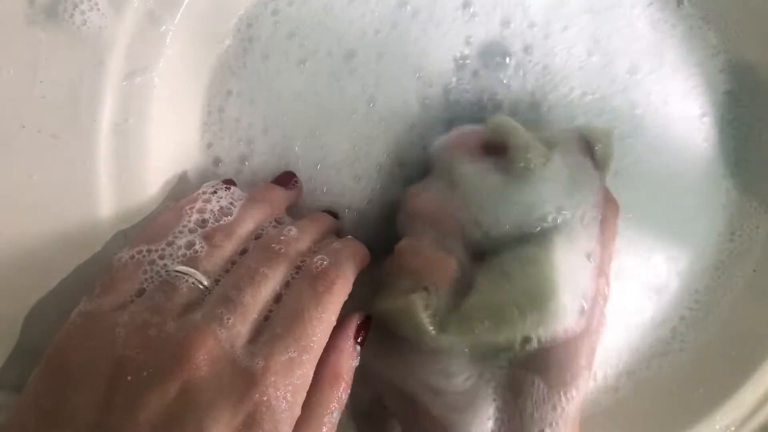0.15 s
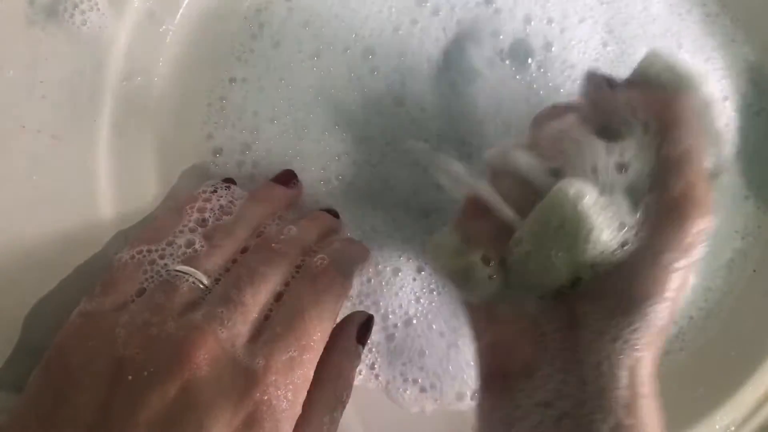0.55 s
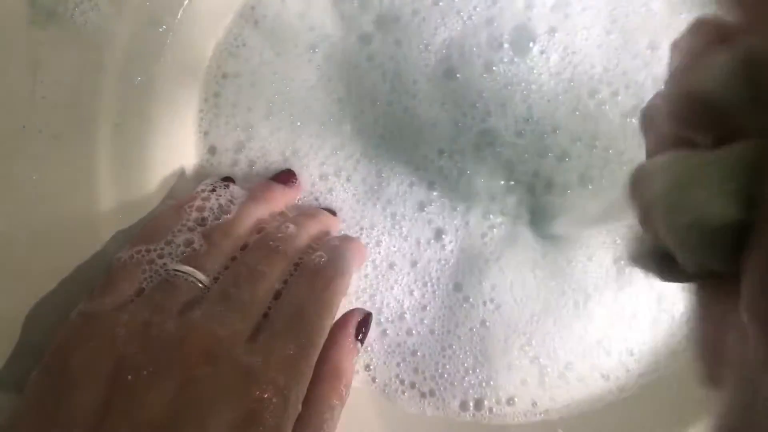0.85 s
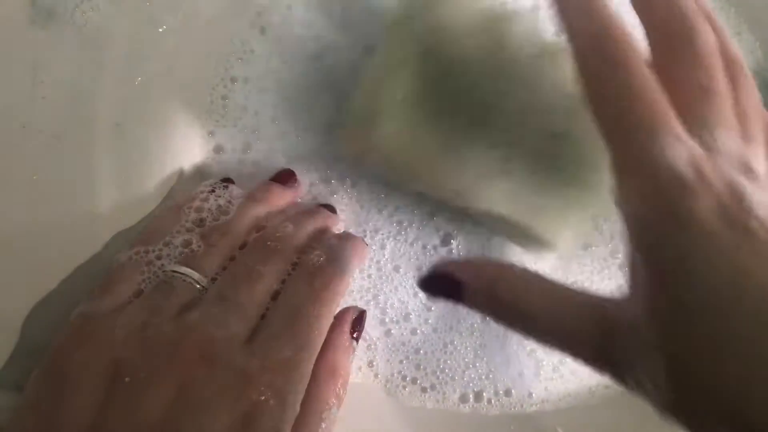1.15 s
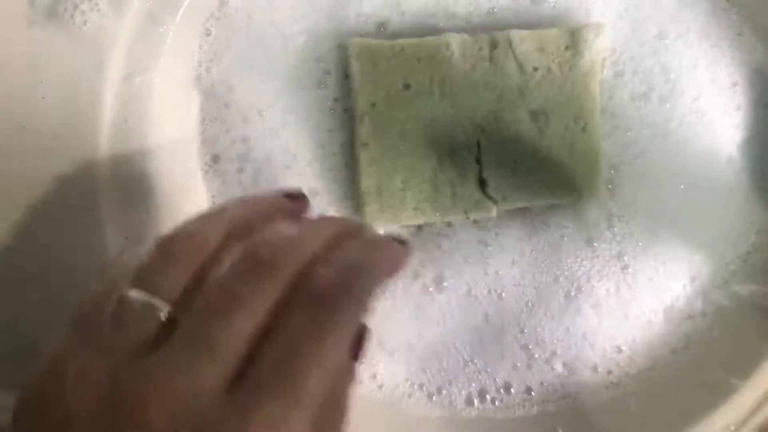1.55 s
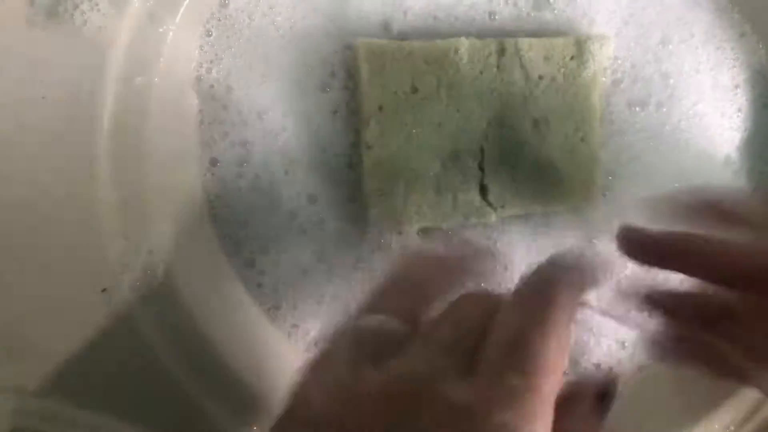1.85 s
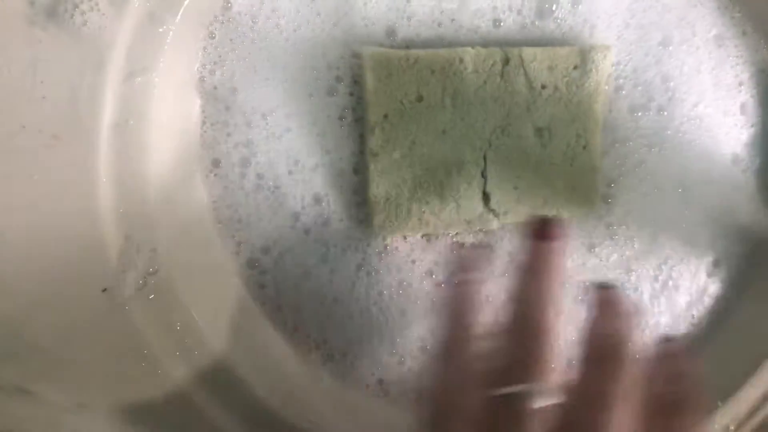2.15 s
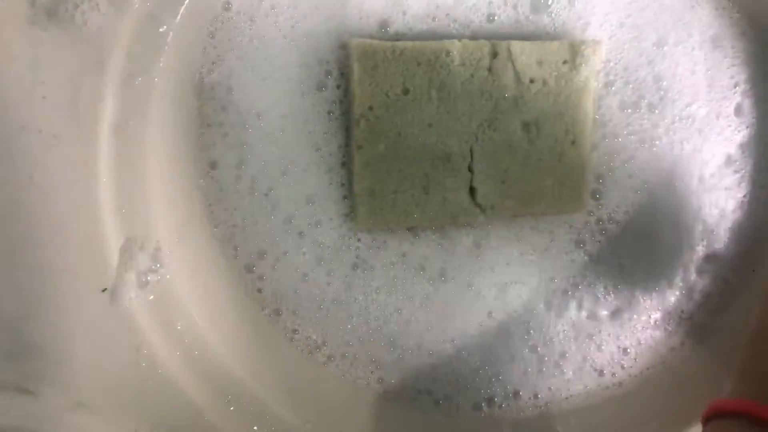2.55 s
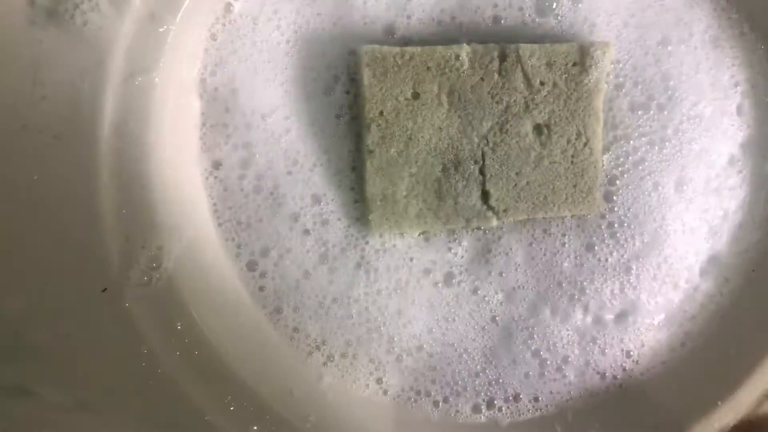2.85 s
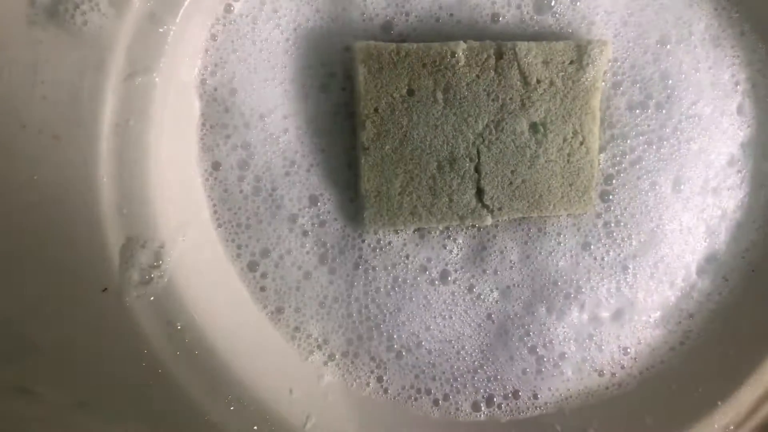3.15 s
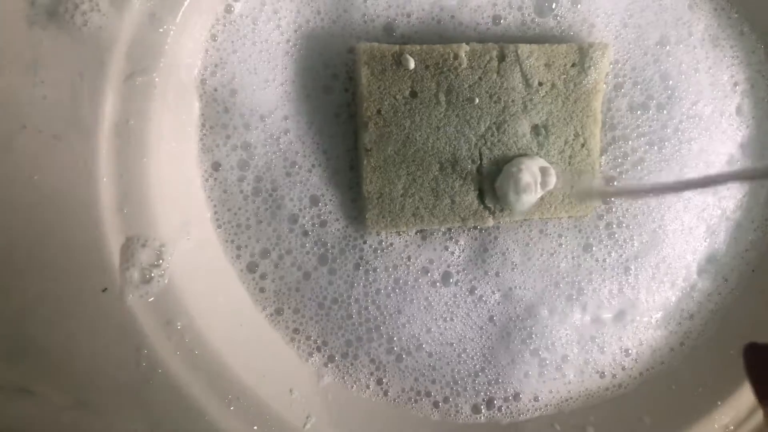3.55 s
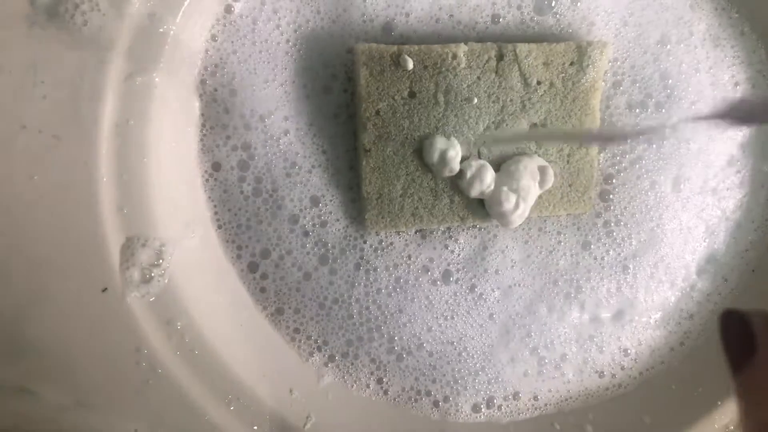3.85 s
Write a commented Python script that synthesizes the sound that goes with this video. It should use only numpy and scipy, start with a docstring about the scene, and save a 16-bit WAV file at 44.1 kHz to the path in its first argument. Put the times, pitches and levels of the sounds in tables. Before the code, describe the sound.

A wet sponge squelches in soapy water, then a foam dispenser hisses and sputters.

```python
"""Suds fizz and water squelches as a soapy sponge is squeezed over a basin of foam in a small bathroom.
The sponge sucks air back in and drops with a plop. One wet flick; something is set down with a knock.
Then a foam dispenser hisses, spits plugs of liquid and gurgles out foam under a ragged whistle.
A fan rumbles and hums beneath it all. All sound cuts out briefly at 2.2 s."""
import sys
import numpy as np
from scipy import signal
from scipy.fft import rfft, irfft
from scipy.io import wavfile

SR = 44100
rng = np.random.default_rng(int(sys.argv[2]) if len(sys.argv) > 2 else 0)


def pcm_store(signal):
    """Save signal as 16-bit PCM."""
    levels = np.round(np.clip(np.atleast_2d(signal), -1, 1) * 32767)
    wavfile.write(sys.argv[1], SR, levels.astype(np.int16).T)


N = 176400
TIME_S = np.arange(N) / SR

# Noise and bubble spectra (frequency [Hz], relative density [dB])
FAN_SPECTRUM = [(35, -41), (68, -9), (230, -11.5), (330, -9.5), (430, -14), (950, -18.5), (1250, -27.5),
                (4000, -32), (15000, -45)]
SUDS_SPECTRUM = [(500, -19), (1500, -3), (3500, -1), (9500, -1.5), (13000, -15.5), (16000, -21)]
WATER_SPECTRUM = [(150, -5), (450, 0.5), (1000, -6.5), (2000, -5.5), (6000, -29)]
PORE_SPECTRUM = [(600, -12.5), (1500, -2.5), (4500, -1), (8000, -3), (12500, -13), (16000, -21)]
SLAP_SPECTRUM = [(120, -12), (500, 1.5), (1000, -3), (1400, -7), (1950, -2.5), (5000, -23), (14000, -31)]
JET_SPECTRUM = [(300, -10), (1200, -6), (2500, -4.5), (4800, 0.5), (8200, -1), (12000, -19.5), (16000, -26)]
SPIT_SPECTRUM = [(120, -7), (300, -1.5), (600, -9.5), (1400, 4), (3300, -4), (8300, 2), (13000, -15.5),
                 (16000, -19)]
FROTH_SPECTRUM = [(120, -9.5), (320, -4), (550, -13.5), (950, -3), (2400, -0.5), (3100, -6.5),
                  (6000, -10.5), (12000, -25)]

# Envelopes (time [s], level [dB])
SUDS_ENVELOPE = [(0, -71.5), (.045, -71), (.06, -51), (.115, -60.5), (.5, -53.5), (.59, -49.5),
                 (.635, -40.5), (.7, -46), (.79, -55), (.95, -66)]
WATER_ENVELOPE = [(0, -63), (.45, -49), (.66, -47.5), (1.2, -64.5)]
REFILL_ENVELOPE = [(.86, -61), (.93, -42.5), (.98, -40), (1.07, -50), (1.13, -45.5), (1.17, -54),
                   (1.2, -74)]
JET_ENVELOPE = [(3.02, -70), (3.085, -53.5), (3.091, -41), (3.14, -35), (3.22, -44.5), (3.33, -41),
                (3.43, -48.5), (3.6, -46.5), (4, -40.5)]

# Wet bursts (time [s], level [dB], decay [s])
WET_SNAPS = [(0.605, -37, .001), (.626, -35, .008), (.844, -38, 0.0018), (.891, -37.5, .002),
             (1.254, -35.5, 0.0061), (1.944, -44, 0.015), (2.5116, -39, 0.0023)]
WET_SLAPS = [(1.238, -33.5, 0.012), (1.2493, -23, 0.0079), (1.945, -43, 0.028)]
NOZZLE_SPITS = [(3.226, -30.5, .006), (3.2315, -20.5, 0.0058), (3.2357, -19.5, .005), (3.2464, -20, 0.0032),
                (3.253, -18.5, 0.0054), (3.2946, -18.5, 0.0094), (3.3073, -18, .002), (3.32, -26, 0.0045),
                (3.763, -24, 0.0044), (3.769, -21, .004), (3.797, -26, .003), (3.9, -25.5, .008),
                (3.954, -22.5, .009)]

# Hum lines (frequency [Hz], level [dB])
FAN_HUM = [(120.6, -57.5), (170, -62), (313, -62.5)]
# Wall reflections (delay [s], gain [ratio])
BASIN_ECHOES = [(.0029, 0.2), (.0051, 0.18)]
# Light ticks, one sponge squeak (time [s], level [dB], pitch [Hz], decay [s])
TICKS_AND_SQUEAK = [(.135, -40, 2300, 0.0013), (.152, -34.5, 2120, .002), (0.552, -43.5, 3670, 0.086),
                    (2.836, -42.5, 2390, 0.003)]
# Knock modes (frequency [Hz], relative level [dB], t60 [s])
KNOCK_PARTIALS = [(110, -15, 0.19), (165, -18, .5), (288, -14, .12), (493, -5.5, 0.034), (690, -4, .03),
                  (1040, 0, .015), (1360, -1, 0.025), (1870, -5.5, 0.0096)]
# Water closing, then a drip (time [s], level [dB], pitch [Hz], t60 [s])
WATER_PLOPS = [(1.248, -30, 325, 0.075), (1.253, -24, 618, 0.057), (1.2635, -22.5, 486, 0.037),
               (1.25, -37.5, 168, .3), (3.028, -32, 2160, 0.017)]
# Nozzle flow (time [s], relative gulp level [dB], relative whistle level [dB], whistle pitch [Hz])
FOAM_FLOW = [(3.22, -56, -79, 4900), (3.331, -42.5, -65, 4900), (3.5, -41.5, -52.5, 4780),
             (3.63, -34.5, -32.5, 4800), (3.78, -31.5, -29.5, 4456), (3.85, -30.5, -26.5, 4226),
             (3.92, -29.5, -30.5, 4210), (4, -28, -28, 4210)]
# Nozzle side resonances (frequency / whistle pitch [ratio], relative level [dB])
SIDE_MODES = [(.84, -5.5), (1.22, -6.5)]
# Biggest gulps, shrill spurts (time [s], level [dB], pitch [Hz])
FOAM_SPURTS = [(3.8, -19, 1340), (3.739, -25, 1380), (3.8445, -21.5, 4420), (3.851, -18, 4270),
               (3.883, -22.5, 1330), (3.932, -22, 1244), (3.961, -21.5, 5150), (3.988, -19.5, 1290)]
# Brief cut of all sound (time [s], gain [dB])
DROPOUT = [(2.194, -1), (2.197, -40), (2.232, -42), (2.241, -14), (2.262, -2.5)]


def from_db(db):
    """Decibels to gain."""
    return 10 ** (np.asarray(db) / 20)


def rms_one(x):
    """Scale to unit rms."""
    return x / np.sqrt(np.mean(x ** 2) + 1e-20)


def level(rows):
    """Gain from (time [s], level [dB]); silent outside the rows, held if near the scene's start or end."""
    time_s, db = np.transpose(rows)[:2]
    before_db = db[0] if time_s[0] < .1 else -150
    after_db = db[-1] if time_s[-1] > 3.9 else -150
    return from_db(np.interp(TIME_S, time_s, db, left=before_db, right=after_db))


def drift(corner_hz):
    """Low-passed random motion; rms 1."""
    hop, settle = 40, 2000
    pole = np.exp(-2 * np.pi * corner_hz * hop / SR)
    noise = rng.standard_normal(N // hop + settle + 2)
    slow = signal.lfilter([1], [1, -2 * pole, pole ** 2], noise)[settle:]
    return np.interp(np.arange(N) / hop, np.arange(len(slow)), rms_one(slow))


def colour(x, spectrum):
    """Filter by a spectrum table; rms 1."""
    hz, db = np.transpose(spectrum)
    bin_hz = np.arange(N // 2 + 1) * SR / N + 1
    gain = from_db(np.interp(np.log(bin_hz), np.log(hz), db)) * np.minimum(bin_hz / hz[0], 1) ** 2
    return rms_one(irfft(rfft(x) * gain, N))


def ring(x, hz, t60_s):
    """Resonator: a unit click rings a decaying unit sine."""
    pole = from_db(-60 / (t60_s * SR))
    step_rad = 2 * np.pi * hz / SR
    return signal.lfilter([0, np.sin(step_rad)], [1, -2 * pole * np.cos(step_rad), pole ** 2], x + 1e-18)


def struck(start_s, hz, t60_s):
    """One decaying sine."""
    age_s = np.maximum(TIME_S - start_s, 0)
    return np.sin(2 * np.pi * hz * age_s) * from_db(-60 * np.minimum(age_s / t60_s, 4))


def tone(hz):
    """Sine of moving pitch; rms 1."""
    return np.sqrt(2) * np.sin(2 * np.pi * np.cumsum(hz) / SR)


def bursts(rows, attack_s):
    """Envelope: a linear rise and exponential fall per row."""
    envelope = np.zeros(N)
    for peak_s, db, decay_s in rows:
        live = slice(*np.searchsorted(TIME_S, [peak_s - attack_s, peak_s + 10 * decay_s]))
        age_s = TIME_S[live] - peak_s
        envelope[live] += from_db(db) * np.minimum(age_s / attack_s + 1, np.exp(-age_s / decay_s))
    return envelope


def bubbles(spectrum, per_s, spread_db, t60_cycles):
    """Bubbles of random strength and pitch, each ringing briefly; rms 1."""
    pitches_hz = np.linspace(300 ** .5, 15000 ** .5, 20) ** 2
    strengths = from_db(spread_db * np.minimum(rng.exponential(1, N), 4)) * rng.choice([-1, 1], N)
    clicks = strengths * (rng.random(N) < per_s / SR)
    band = rng.integers(0, len(pitches_hz), N)
    rings = sum(ring(clicks * (band == k), hz, t60_cycles / hz) * hz ** .75
                for k, hz in enumerate(pitches_hz))
    return colour(rings, spectrum)


def resonance(hz, width_hz):
    """Turbulence ringing in a cavity of moving pitch; rms 1."""
    phase_rad = 2 * np.pi * np.cumsum(hz) / SR
    return rms_one(drift(width_hz) * np.cos(phase_rad) + drift(width_hz) * np.sin(phase_rad))


def fan():
    """Low rumble with wavering hum lines."""
    hum = sum(from_db(db) * tone(hz + 2.49 * drift(5.9)) for hz, db in FAN_HUM)
    return hum + from_db(-52) * colour(rng.standard_normal(N), FAN_SPECTRUM)


def bathroom(x, t60_s=.38, delay_s=.00496, lowpass_hz=5030, gain_db=-7):
    """Short, slightly dull tail of dense reflections."""
    age_s = TIME_S[:SR // 2]
    tail = rng.standard_normal(len(age_s)) * from_db(-60 * age_s / t60_s) * (age_s > delay_s)
    tail = signal.sosfilt(signal.butter(1, lowpass_hz, fs=SR, output="sos"), tail / np.linalg.norm(tail))
    return from_db(gain_db) * signal.fftconvolve(x, tail)[:N]


def basin(x):
    """Early reflections off the basin wall."""
    return sum(gain * np.interp(TIME_S - delay_s, TIME_S, x, left=0) for delay_s, gain in BASIN_ECHOES)


def small_sounds():
    """Sharp foam pops and one wet flick; cavities ring in light ticks and one squeak of the sponge."""
    noise = rng.standard_normal(N)
    sound = colour(noise, SUDS_SPECTRUM) * bursts(WET_SNAPS, attack_s=.0011)
    for time_s, db, hz, decay_s in TICKS_AND_SQUEAK:
        cavity = rms_one(ring(noise, hz, t60_s=min(.79 * decay_s, .0074)))
        sound += cavity * bursts([(time_s, db, decay_s)], attack_s=.00087)
    return sound


def knock(start_s=2.52, gain_db=-22, room_send=1.08):
    """An object set down rings dully; farther off, it excites more of the room."""
    modes = sum((-1) ** k * from_db(gain_db + db) * struck(start_s, hz, t60_s)
                for k, (hz, db, t60_s) in enumerate(KNOCK_PARTIALS))
    return modes + room_send * bathroom(modes)


def sponge_squeeze():
    """Suds and water are pressed out, then air refills the pores; standing foam crackles throughout."""
    suds = bubbles(SUDS_SPECTRUM, per_s=8000, spread_db=3.5, t60_cycles=13.5) * from_db(2 * drift(70))
    water = bubbles(WATER_SPECTRUM, per_s=1300, spread_db=3, t60_cycles=13.6)
    crackle = bubbles(SUDS_SPECTRUM, per_s=2500, spread_db=3.5, t60_cycles=16)
    air = bubbles(PORE_SPECTRUM, per_s=14000, spread_db=3.5, t60_cycles=6)
    return (suds * level(SUDS_ENVELOPE) + water * level(WATER_ENVELOPE)
            + air * level(REFILL_ENVELOPE) + crackle * from_db(-66))


def slaps_and_plops():
    """The sponge lands and water closes round it; later a wet hand makes contact, then one drip."""
    slap = bubbles(SLAP_SPECTRUM, per_s=15000, spread_db=2.5, t60_cycles=7.9)
    plops = sum(from_db(db) * struck(time_s, hz, t60_s) for time_s, db, hz, t60_s in WATER_PLOPS)
    return slap * bursts(WET_SLAPS, attack_s=.0019) + plops


def nozzle_jet():
    """Gas hisses out; plugs of liquid spit through it."""
    gas = colour(rng.standard_normal(N), JET_SPECTRUM) * from_db(1.6 * drift(60))
    spit = bubbles(SPIT_SPECTRUM, per_s=14000, spread_db=2.5, t60_cycles=4.2)
    return gas * level(JET_ENVELOPE) + spit * bursts(NOZZLE_SPITS, attack_s=.00085)


def nozzle_whistle(opening, width_hz=260, rough_db=3.5, gain_db=-1):
    """Turbulence rings the nozzle, swelling raggedly with each gulp."""
    time_s, _, db, hz = np.transpose(FOAM_FLOW)
    ragged = rms_one((.25 + opening) * from_db(rough_db * drift(80)))
    centre_hz = np.interp(TIME_S, time_s, hz) * (1 + .025 * drift(39.9))
    main = resonance(centre_hz, width_hz)
    sides = sum(from_db(side_db) * resonance(ratio * centre_hz, 2 * width_hz)
                for ratio, side_db in SIDE_MODES)
    return (main + sides) * ragged * level(np.c_[time_s, db + gain_db])


def spurts(half_width_s=.0029):
    """Big gulps and shrill spurts: Gaussian tone pips."""
    sound = np.zeros(N)
    for peak_s, db, hz in FOAM_SPURTS:
        age_s = TIME_S - peak_s
        window = np.exp(-np.minimum((age_s / half_width_s) ** 2, 20))
        sound += from_db(db) * np.sqrt(2) * np.sin(2 * np.pi * hz * age_s) * window
    return sound


def foam_gurgle(gulps_per_s=62, base_hz=1111, swing_hz=289.5, jitter_hz=180):
    """Foam leaves in uneven gulps, each a hollow note that rises and falls, with froth and a whistle."""
    gulp_count = np.cumsum(gulps_per_s * np.exp(.25 * drift(29.96))) / SR
    opening = np.abs(np.sin(np.pi * gulp_count))
    gulps = rms_one(opening ** 3 * from_db(2 * drift(35)))
    note = tone(base_hz + swing_hz * opening + jitter_hz * drift(250.4)) * gulps
    froth = bubbles(FROTH_SPECTRUM, per_s=7000, spread_db=3.5, t60_cycles=7) * rms_one(1.8 + gulps)
    flow = level(FOAM_FLOW)
    return from_db(-.5) * flow * note + from_db(-9.5) * flow ** .74 * froth + nozzle_whistle(opening)


def scene():
    """Sponge, handling and dispenser through basin and room, over the fan; mono."""
    direct = sponge_squeeze() + slaps_and_plops() + small_sounds() + knock()
    direct += nozzle_jet() + foam_gurgle() + spurts()
    near = direct + basin(direct)
    return (near + bathroom(near) + fan())[None]


def record(dry, highpass_hz=45, lowpass_hz=15850):
    """The microphone loses deep bass; one dropout; steep treble cut."""
    thin = signal.sosfilt(signal.butter(2, highpass_hz, "high", fs=SR, output="sos"), dry)
    dropout = from_db(np.interp(TIME_S, *np.transpose(DROPOUT)))
    return signal.sosfilt(signal.ellip(12, .2, 80, lowpass_hz, fs=SR, output="sos"), thin * dropout)


dry = scene()
out = record(dry)
pcm_store(out)
```